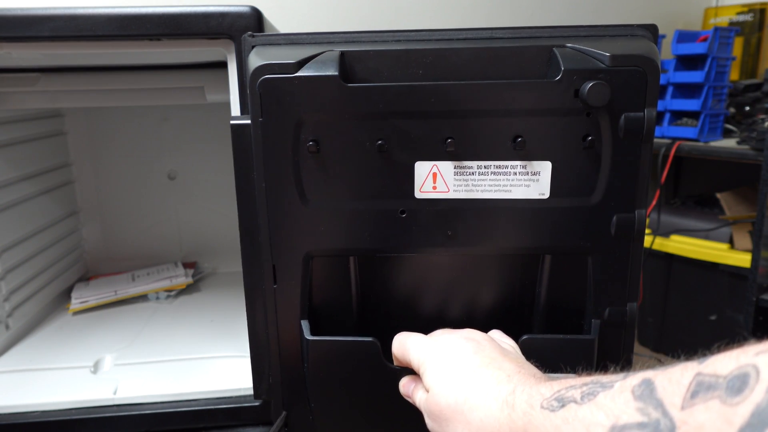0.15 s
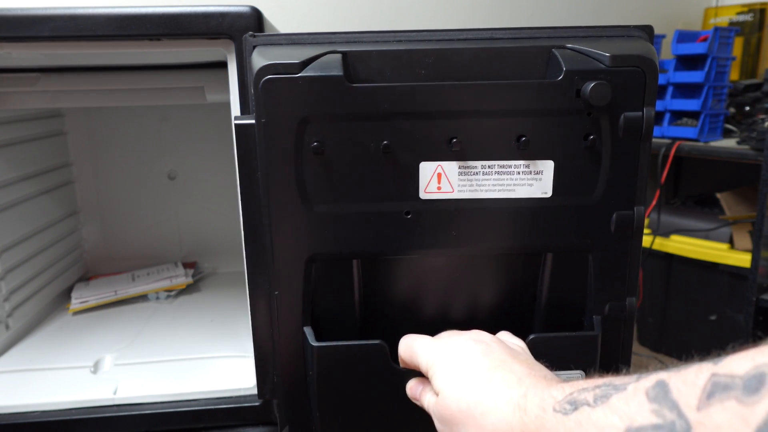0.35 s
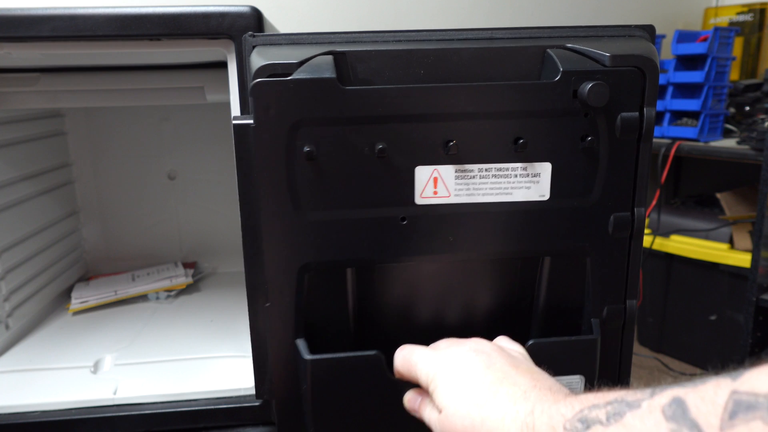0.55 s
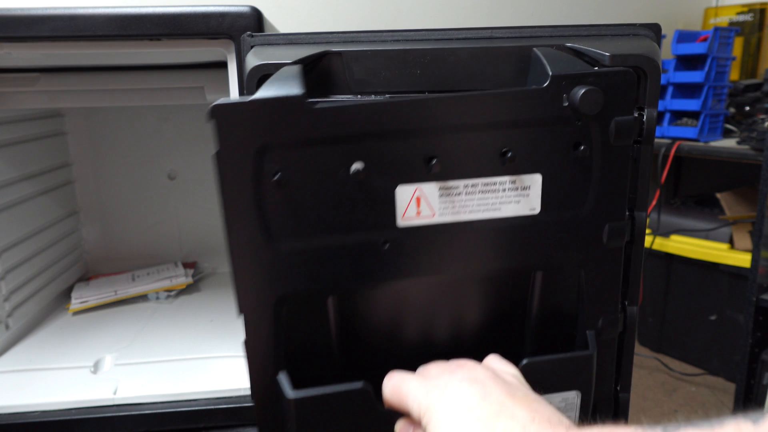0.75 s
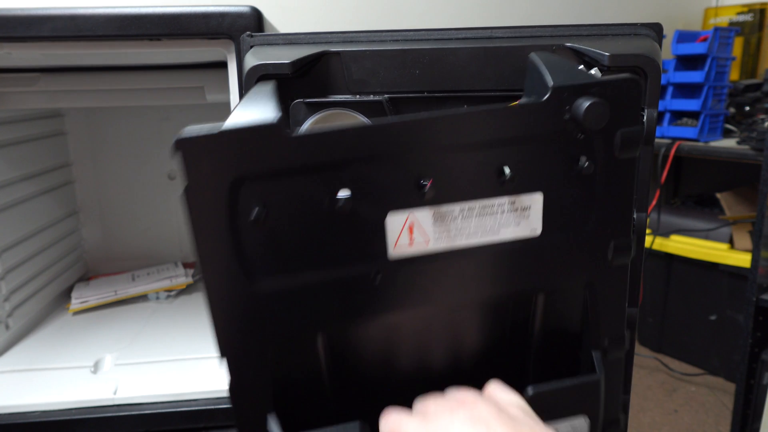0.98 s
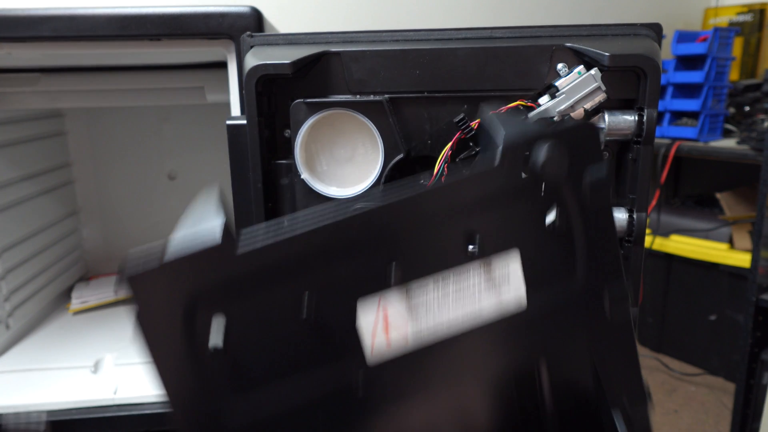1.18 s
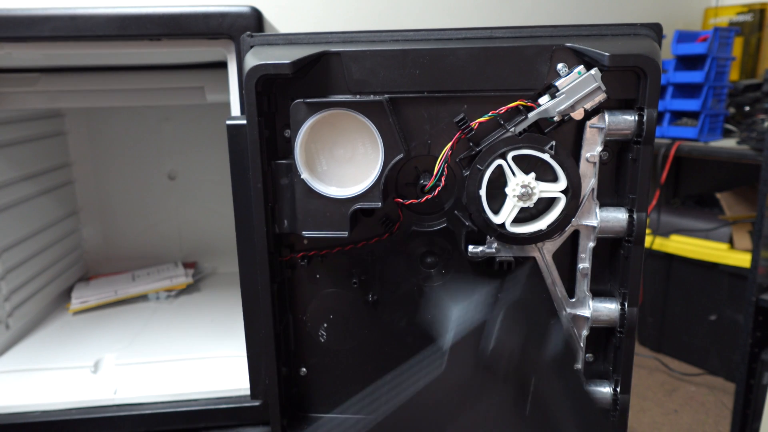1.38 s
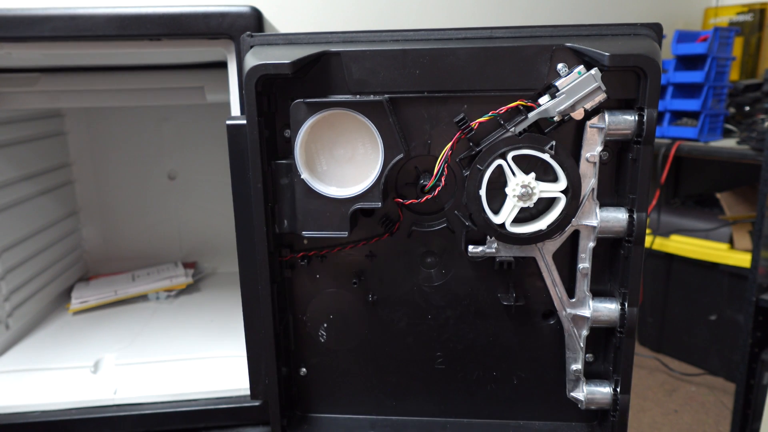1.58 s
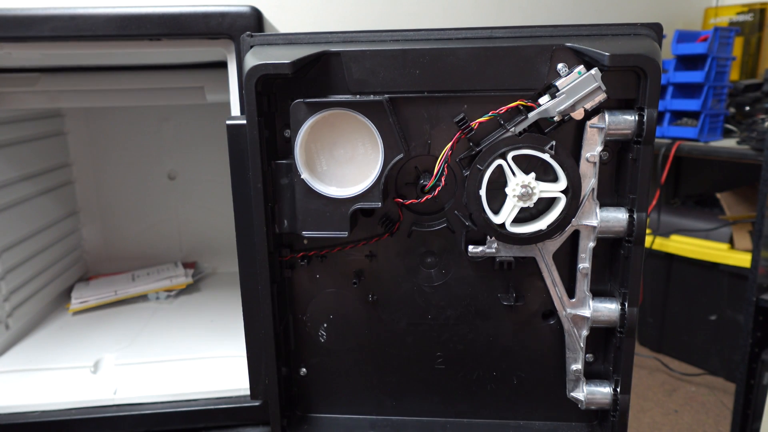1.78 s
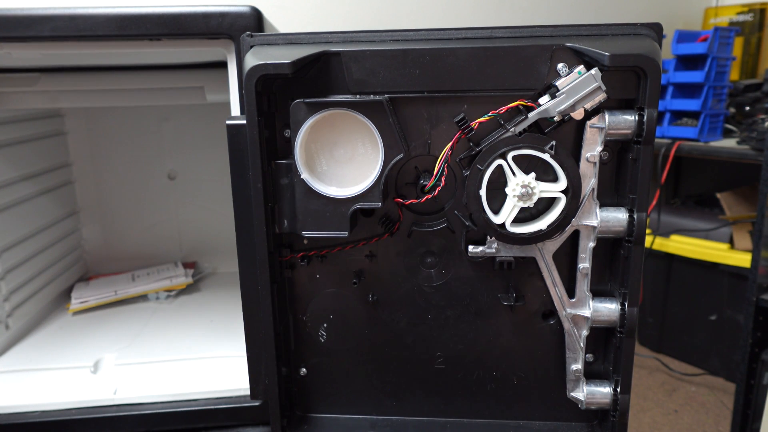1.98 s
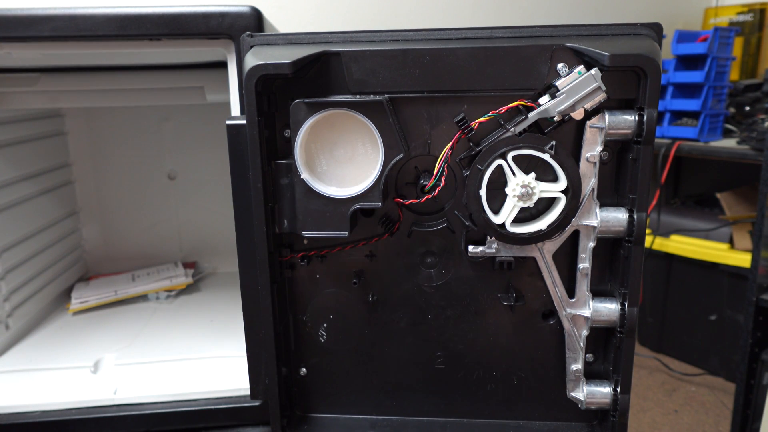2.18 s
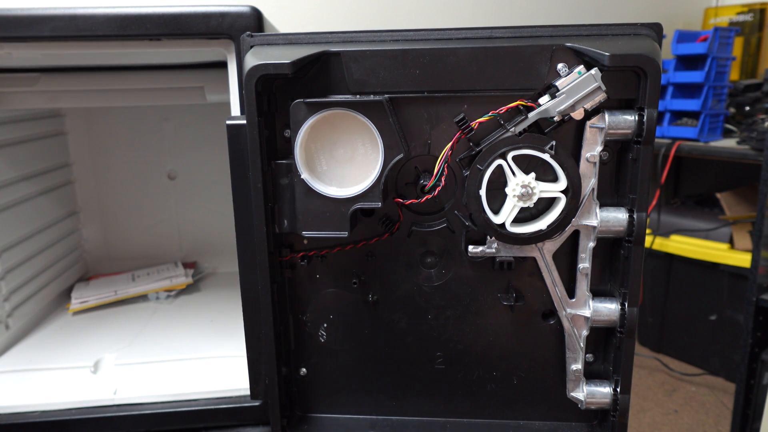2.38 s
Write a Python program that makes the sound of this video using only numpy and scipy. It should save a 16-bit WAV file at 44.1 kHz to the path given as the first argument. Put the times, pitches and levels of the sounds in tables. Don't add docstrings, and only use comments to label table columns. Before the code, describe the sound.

A hard plastic panel is wrenched off a door, clips cracking, then clatters onto the floor

```python
import sys
import numpy as np
from scipy import signal
from scipy.fft import rfft, irfft
from scipy.io import wavfile
from scipy.ndimage import uniform_filter1d

SR = 44100
rng = np.random.default_rng(int(sys.argv[2]) if len(sys.argv) > 2 else 0)


def materialize(psi):
    bounded = np.clip(np.atleast_2d(psi).T, -1, 1)
    quanta = np.round(bounded * 32767).astype(np.int16)
    wavfile.write(sys.argv[1], SR, quanta)


def boost_factor(decibels):
    exponent = np.asarray(decibels, float) / 20
    return 10 ** exponent


N = 108045
TIME = np.arange(N) / SR

# (pitch [Hz], level [dB], time to fall 60 dB [s])
HELD_RINGS = [(360, -17, 0.034), (456.7, -6.5, 0.33), (565.3, 3.5, 0.14), (640, 5, .1), (871, 2, 0.087),
              (885, -4.5, 0.17), (1020, 4.5, 0.032), (1200, 0.5, 0.13), (1444, -3.5, .1), (1554, -7, 0.055),
              (1810, -13.5, 0.12), (2420, -13, .08), (2830, -15.5, .08), (3040, -14.5, 0.16)]
# (pitch [Hz], level [dB], time to fall 60 dB [s])
LAID_RINGS = [(156, -12.5, 0.42), (237, 0, 0.4), (334, -2.5, 0.32), (570, -16.5, 0.14), (644, -22.5, 0.14),
              (825, -8, 0.26), (894, -4, 0.16), (1010, -22, 0.36), (1170, -32, 0.12), (1440, -26, 0.3),
              (1808, -7.5, 0.077), (2064, 2.5, 0.053), (2353, -21, 0.12), (2800, -40, 0.11)]
# (frequency [Hz], level [dB per Hz])
SHEET = [(120, -30.5), (294, -20.5), (400, -3.5), (600, -2), (1100, -1), (2400, -12.5), (3300, -18),
         (4500, -25.5)]
# (frequency [Hz], level [dB per Hz])
ROUGH_CONTACT = [(2500, -3), (4270, -6.5), (7000, -9), (8900, -11.5), (10200, -22), (11800, -17),
                 (13200, -24), (16000, -27.5)]
RING_DAMPING = .5


def rms_one(x):
    return x / np.sqrt(np.mean(x ** 2) + 1e-20)


def energy_one(x):
    return x / np.sqrt(np.sum(x ** 2))


def high(x, hz):
    return signal.sosfilt(signal.butter(3, hz, "high", fs=SR, output="sos"), x)


def wander(hz):
    drift = signal.sosfilt(signal.butter(2, hz, fs=SR, output="sos"), rng.standard_normal(N + SR))
    return rms_one(drift[SR:])


def ring(x, hz, t60):
    shrink = boost_factor(-60 / (max(t60, .0003) * SR))
    turn = 2 * np.pi * hz / SR
    return signal.lfilter([0, np.sin(turn)], [1, -2 * shrink * np.cos(turn), shrink ** 2], x + 1e-18)


def modes(force, table, damping, longest=.13):
    out = 0
    for k, (hz, db, t60) in enumerate(table):
        out = out + (-1) ** k * boost_factor(db) * ring(force, hz, min(t60 * damping, longest))
    return out


def colour(x, points):
    hz, db = np.transpose(points)
    f = np.maximum(np.fft.rfftfreq(4096, 1 / SR), 1)
    octaves_outside = np.maximum(np.log2(hz[0] / f), 0) + np.maximum(np.log2(f / hz[-1]), 0)
    level = np.interp(np.log(f), np.log(hz), db) - 24 * octaves_outside
    cepstrum = irfft(np.log(boost_factor(level)))
    cepstrum[1:2048] *= 2
    cepstrum[2049:] = 0
    h = irfft(np.exp(rfft(cepstrum)))
    return signal.fftconvolve(x, energy_one(h))[:len(x)]


def knocks(events, table, modes_db, own_t60, sheet_db, chatter_ms, crack_ms):
    out, size = np.zeros(N + SR), SR // 2
    t = np.arange(size) / SR
    for s, ring_db, ring_hz, clack_db, crack_db in events:
        noise, chance = rng.standard_normal(size), rng.random(size)
        touch = noise * (chance < .15) * np.exp(-t / (chatter_ms / 1000))
        touch[0] = 1
        touch = energy_one(touch)
        tilt = rng.normal(0, 3.0, len(table))
        struck = [(hz, db + change, t60) for (hz, db, t60), change in zip(table, tilt)]
        own = ring(np.arange(size) == 0, ring_hz, own_t60) + .5 * ring(touch, ring_hz, own_t60)
        clack = boost_factor(modes_db) * modes(touch, struck, RING_DAMPING) + boost_factor(sheet_db) * colour(touch, SHEET)
        crack = colour(noise * np.exp(-t / (crack_ms / 1000)), ROUGH_CONTACT)
        i = int(s * SR)
        out[i:i + size] += boost_factor(ring_db - 3) * own + boost_factor(clack_db) * clack + boost_factor(crack_db + 12) * crack
    return out[:N]


def scrape(rows, table, modes_db, sheet_db):
    slips_per_s, slip_spread_db, judder_db, judder_hz = 3200, 2.8, 2.3, 80
    s, force_db, grit_db = np.transpose(rows)
    on = uniform_filter1d(1. * (TIME > s[0]) * (TIME < s[-1]), size=200)
    force, grit = np.interp(TIME, s, force_db), np.interp(TIME, s, grit_db)
    sizes = boost_factor(slip_spread_db * np.minimum(rng.exponential(1, N), 4)) * rng.choice([-1, 1], N)
    slips = rms_one(sizes * (rng.random(N) < slips_per_s / SR)) * boost_factor(judder_db * wander(judder_hz))
    drive = slips * on * boost_factor(force)
    rung = modes(drive, table, RING_DAMPING) / np.std(modes(slips, table, RING_DAMPING))
    hiss = (rng.standard_normal(N) + 0.19 * slips) * boost_factor(0.5 * wander(27)) * on * boost_factor(force + grit)
    return boost_factor(modes_db) * rung + boost_factor(sheet_db) * colour(drive, SHEET) + colour(hiss, ROUGH_CONTACT)


def clips_let_go():
    # (time [s], ring level [dB], ring pitch [Hz], clack level [dB], crack level [dB])
    snaps = [(.2415, -2, 884, -1, -11), (.281, -3.5, 630, -11, -35), (.389, -2.5, 606, -8, -40.5),
             (.413, -6, 526, -5, -44), (.417, -16.5, 640, -8.5, -44.5), (.432, -4, 950, -11, -66),
             (.463, -12, 1440, -4, -33.5), (.467, -3, 1078, -12, -42.5), (.4755, -1.5, 1026, -25, -49),
             (.485, -14.5, 905, -27, -54), (.552, -32, 3500, -45, -43), (.582, -10.5, 826, -28, -70),
             (.586, -13.5, 1454, -23, -68), (.598, -34, 1010, -33, -72), (.691, -10, 451, -16, -42),
             (.695, -14, 1200, -20.5, -46.5), (.7535, -16, 650, -16.5, -53.5), (.769, -15, 666, -16.5, -65),
             (.776, -23.5, 700, -20.5, -68), (.854, -48.5, 1000, -33.5, -62)]
    sound = knocks(snaps, HELD_RINGS, modes_db=-11.5, own_t60=.022, sheet_db=13, chatter_ms=2.0, crack_ms=2.32)
    return high(sound, 240)


def panel_grates():
    # (time [s], force [dB], grit over force [dB])
    pulls = [
        [(.243, -23, -23), (.262, -15, -7.5), (.33, -16.5, -6), (.38, -17, -17), (.405, -27.5, -11),
         (.43, -17, -37), (.49, -30.5, -13), (.53, -29, -20), (.57, -44.5, -8)],
        [(.575, -28, -39), (.61, -40.5, -5.5), (.64, -31.5, -10), (.685, -27.5, -11.5), (.72, -34, -26),
         (.75, -49, -41), (.79, -45, -9), (.83, -46, -60), (.9, -71, -3)],
    ]
    return high(scrape(np.concatenate(pulls), HELD_RINGS, modes_db=-10.0, sheet_db=-1.3), 240)


def pings():
    # (time [s], level [dB], pitch [Hz], swell [s], time to fall 60 dB [s])
    patches = [(.4125, -10, 606, 0.0017, 0.012), (.416, 0.5, 644, 0.0022, 0.013),
               (.463, -11.5, 2040, 0.0018, 0.012), (.463, -18, 3220, 0.0015, 0.019),
               (.573, -25, 640, 0.0035, 0.023), (.583, -7, 672, 0.0044, 0.018),
               (.597, -15.5, 1043, 0.0022, .04), (.6905, -25.5, 2333, 0.0024, .05),
               (.692, -27, 2770, 0.0041, 0.042), (0.6896, -20.5, 3005, 0.0013, 0.046),
               (.7, -16, 617, 0.0065, 0.12), (.753, -15, 1045, 0.0056, 0.035),
               (.754, -19.5, 1440, .003, 0.023), (.753, -29.5, 3040, 0.0036, 0.025),
               (.7535, -34, 3450, 0.0018, 0.038), (.77, -20.5, 1030, 0.0072, 0.0078),
               (.769, -28.5, 2384, 0.0087, 0.031), (.768, -35, 3350, .003, 0.026),
               (1.468, -15, 1032, 0.0079, 0.031), (1.468, -22, 2270, 0.0032, 0.042),
               (1.47, -28, 2730, 0.0021, .04), (1.468, -31.5, 3240, 0.0035, .04),
               (1.616, -37.5, 2112, 0.0052, 0.1), (1.617, -41, 894, .005, 0.088),
               (1.722, -30.5, 2020, 0.0021, 0.05), (1.82, -28, 802, 0.008, 0.1),
               (1.925, -32, 1860, 0.031, 0.043)]
    out, rough = np.zeros(N), boost_factor(2.5 * wander(200))
    for s, db, hz, swell, t60 in patches:
        age = np.maximum(TIME - s, 0)
        rise = np.sin(np.pi / 2 * np.minimum(age / max(swell, .001), 1)) ** 2
        level = boost_factor(db - 60 * np.maximum(age - swell, 0) / max(t60, .005))
        out += level * rise * np.sin(2 * np.pi * (hz * age + rng.random()))
    return out * rough


def creaks():
    # (time [s], span [s], pitch [Hz], width [Hz], level [dB])
    rubs = [(.652, 0.045, 1770, 250, -31), (1.13, 0.054, 1600, 43.2, -63), (1.32, 0.041, 1606, 43.2, -66.5),
            (1.94, 0.015, 1868, 50, -34), (2.36, 0.064, 1517, 43, -62.5), (0.32, 0.038, 2280, 800, -20),
            (0.638, 0.022, 2340, 500, -37.5), (0.666, 0.048, 3400, 830, -35.5),
            (1.534, 0.039, 5370, 4000, -57.5), (1.62, 0.0046, 5250, 680, -45.5),
            (1.642, .022, 4000, 3000, -54.5), (1.98, 0.038, 2700, 1600, -41), (.4, .13, 60, 55, -53),
            (.012, 0.0067, 800, 300, -33), (.445, 0.019, 780, 500, -26), (1.73, 0.0087, 3500, 3000, -37)]
    out = 0
    for s, span, hz, width, db in rubs:
        grains = rng.standard_normal(N) * (rng.random(N) < .1)
        rubbed = ring(ring(grains, hz, 1.4 / width), hz, 1.4 / width)
        out = out + boost_factor(db) * rms_one(rubbed) * np.exp(-np.abs((TIME - s) / span) ** 3)
    return out


def panel_drops():
    # (time [s], ring level [dB], ring pitch [Hz], clack level [dB], crack level [dB])
    hits = [(1.466, -29.5, 990, -18.5, -59), (1.47, -25, 807, -11, -48), (1.476, -17, 1776, -14, -65),
            (1.482, -18, 996, -22, -50), (1.538, -40, 1000, -28, -75), (1.616, -58, 2380, -23, -55),
            (1.7215, -29, 1080, -12, -52), (1.725, -26.5, 1120, -12, -69), (1.73, -19.5, 1054, -17, -67),
            (1.739, -18, 1170, -14.5, -61), (1.828, -38, 1300, -26, -60)]
    sound = knocks(hits, LAID_RINGS, modes_db=-12.0, own_t60=.035, sheet_db=15.0, chatter_ms=8.3, crack_ms=5.7)
    return high(sound, 380)


def thumps():
    # (time [s], level [dB], pitch [Hz], time to fall 60 dB [s])
    pushes = [(1.466, -43, 60.8, 0.48), (1.471, -28.5, 156, 0.37), (1.471, -31, 237, 0.18),
              (1.472, -29, 334, 0.15), (1.622, -14, 168, 0.036), (1.644, -30, 214, 0.073),
              (1.735, -24.5, 235.5, 0.78), (1.745, -31, 335.5, 1), (1.761, -29.5, 423.3, 0.41),
              (.008, -31.5, 374, 0.16), (.01, -40.5, 154.8, .15), (0.263, -37.5, 146, 1),
              (0.319, -30, 224, 0.17)]
    settle_s, settle_span_s = 1.872, 0.01
    out = 0
    for s, db, hz, t60 in pushes:
        age = TIME - s
        swell = np.clip(age / .006, 0, 1)
        fall = boost_factor(-60 * np.maximum(age, 0) / t60)
        out = out + boost_factor(db) * np.sin(2 * np.pi * hz * age) * fall * swell * boost_factor(2.5 * wander(22))
    return out * (1 - np.tanh((TIME - settle_s) / settle_span_s)) / 2


def panel_slides():
    # (time [s], force [dB], grit over force [dB])
    path = [(1.73, -40.5, -15), (1.8, -33, -21), (1.87, -41, -9.5), (1.91, -37.5, -18),
            (1.945, -27.5, -28.5), (1.99, -34.5, -15), (2.05, -39, -21), (2.15, -46.5, -10), (2.45, -69, 4)]
    return high(scrape(path, LAID_RINGS, modes_db=-14, sheet_db=-3.3), 93)


def fingers_grip():
    # (time [s], ring level [dB], ring pitch [Hz], clack level [dB], crack level [dB])
    grips = [
        (.004, -17, 546, -20, -80),
        (.014, -24.5, 375, -26.5, -90),
        (.18, -43, 400, -42.5, -93),
        (.195, -43.5, 600, -42, -88.5),
    ]
    sound = knocks(grips, HELD_RINGS, modes_db=-14.5, own_t60=0.019, sheet_db=16.7, chatter_ms=18.0, crack_ms=3.0)
    return high(signal.lfilter(*signal.butter(2, 700, fs=SR), sound), 240)


def squeak():
    hz, width_hz, level_db = 1880, 22, -48.5
    middle_s, span_s = 1.89, .085
    out = 0
    for k, db in ((1, -1.5), (2, -10.5)):
        tone = ring(rng.standard_normal(N), k * hz, 3.4 / (k * width_hz))
        out = out + boost_factor(db) * rms_one(tone)
    return boost_factor(level_db) * out * np.exp(-((TIME - middle_s) / span_s) ** 4)


def chink():
    # (pitch [Hz], level [dB], time to fall 60 dB [s])
    metal = [(2981, 1.5, 0.26), (3112, -2, 0.4), (4360, -0.5, 0.35), (5240, 6, 0.096), (6160, -11, 0.52),
             (6410, 0, 0.22), (6760, 10.5, 0.042), (7240, -6, 0.49)]
    start_s, level_db, rattle_ms = 2.141, -46, 16.0
    age = TIME - start_s
    fade = (age > 0) * np.exp(-np.maximum(age, 0) / (rattle_ms / 1000))
    touch = rng.standard_normal(N) * (rng.random(N) < .05) * fade
    return boost_factor(level_db) * modes(energy_one(touch), metal, .6, longest=.2)


def swish():
    middle_s, span_s, level_db, hz = 0.95, 0.071, -57.5, 5630
    band = signal.butter(1, [.5 * hz, 1.085 * hz], "band", fs=SR, output="sos")
    air = signal.sosfilt(band, rng.standard_normal(N))
    return boost_factor(level_db) * rms_one(air) * np.exp(-((TIME - middle_s) / span_s) ** 2)


def room(x):
    t60_s, level_db, wall_hz = 0.27, -15.5, 3500
    t = np.arange(SR // 2) / SR
    tail = rng.standard_normal(len(t)) * boost_factor(-60 * t / t60_s) * (t > .006)
    tail = signal.lfilter(*signal.butter(1, wall_hz, fs=SR), tail)
    return boost_factor(level_db) * signal.fftconvolve(x, energy_one(tail))[:N]


def room_tone():
    # (frequency [Hz], level [dB per Hz])
    air = [(25, -6), (92, -9), (153, -4.5), (240, -2.5), (476, -10), (714, -15), (1700, -24.5),
           (16000, -43)]
    return colour(rng.standard_normal(N + SR), air)[SR:] * boost_factor(-52.5 + 0.8 * wander(2.7))


def scene():
    pulled = clips_let_go() + panel_grates() + pings() + creaks()
    fallen = panel_drops() + thumps() + panel_slides()
    near = pulled + fallen + fingers_grip() + squeak() + chink() + swish()
    return (near + room(near) + room_tone())[None]


def top_cut(x):
    return signal.sosfilt(signal.butter(12, 17150, fs=SR, output="sos"), x)


def record(dry):
    flattened = 1.1 * np.tanh(dry / 1.1)
    mix = signal.sosfilt(signal.cheby2(10, 60, 16500, fs=SR, output="sos"), flattened)
    return top_cut(np.clip(mix, -.97, .97))


dry = scene()
out = record(dry)
materialize(out)
```